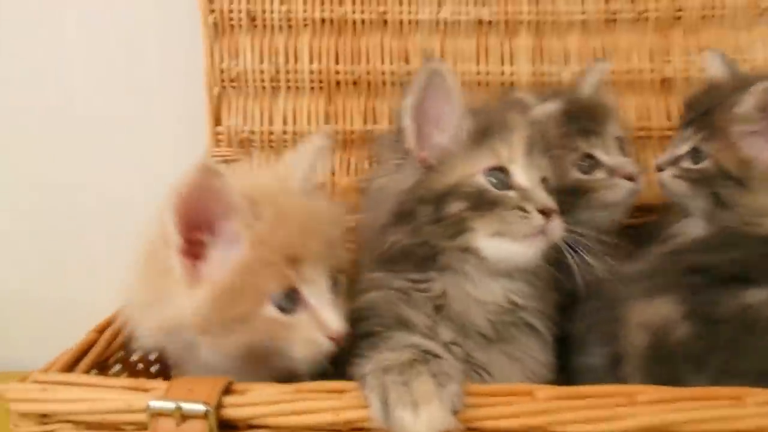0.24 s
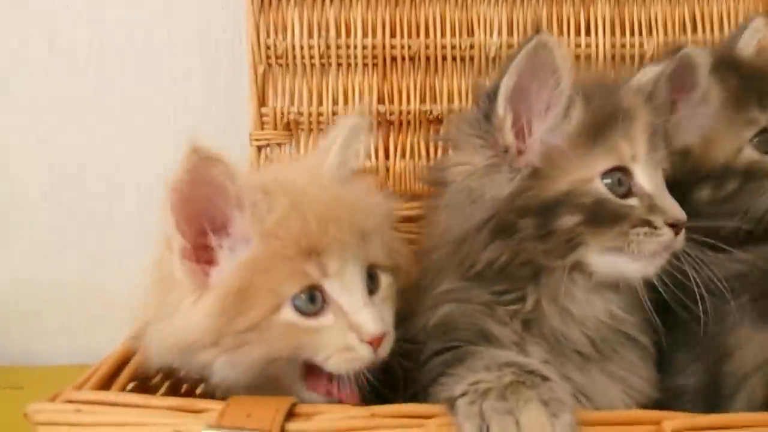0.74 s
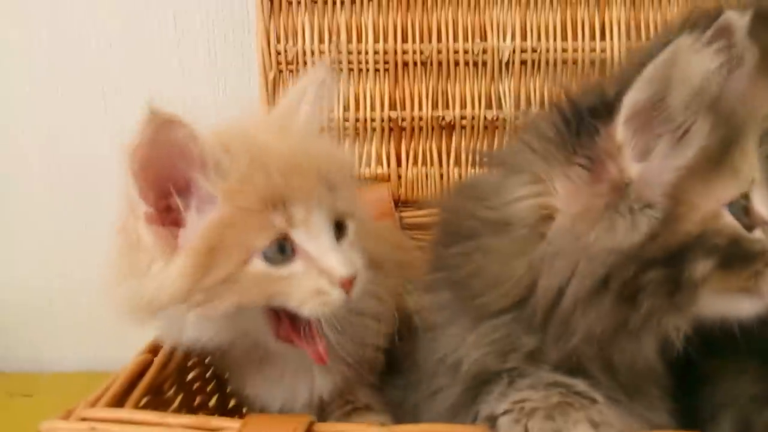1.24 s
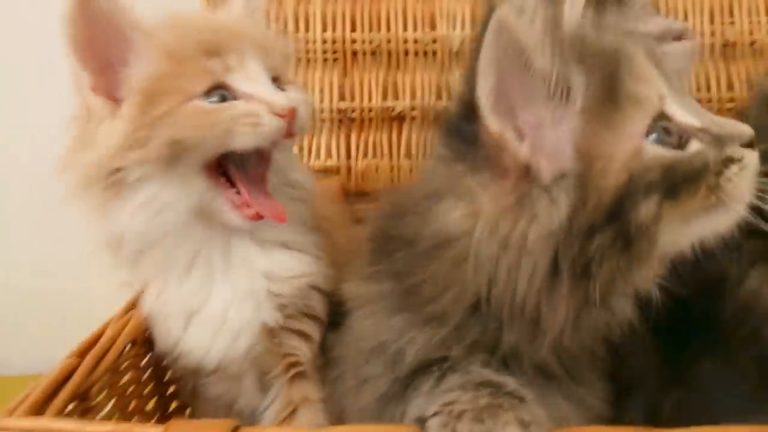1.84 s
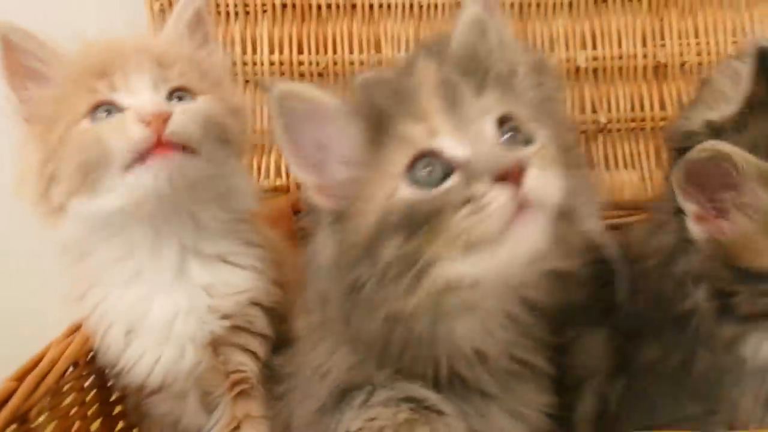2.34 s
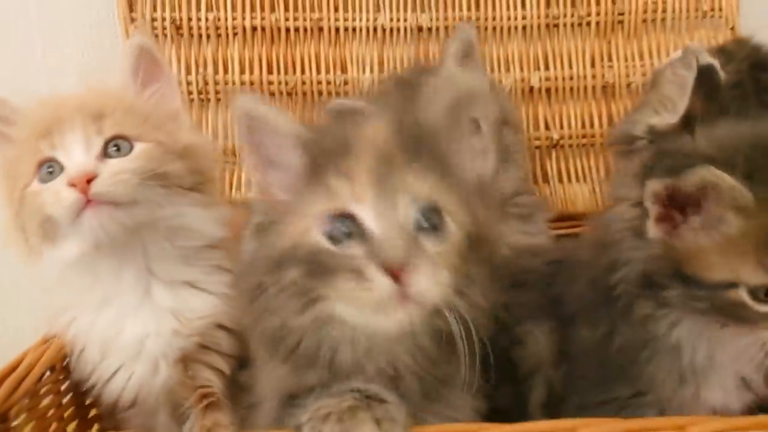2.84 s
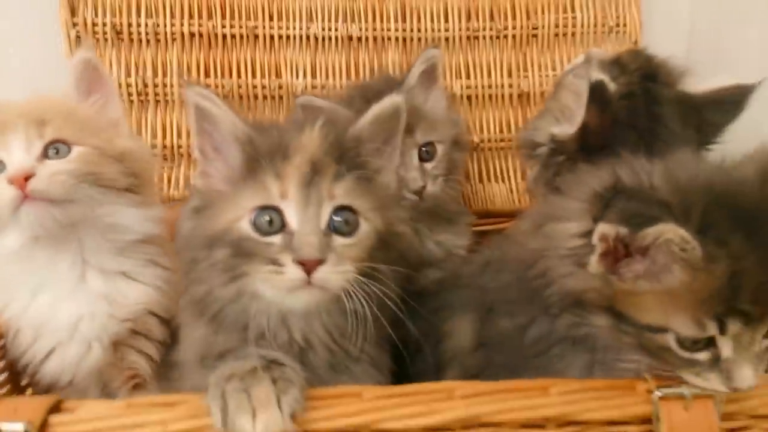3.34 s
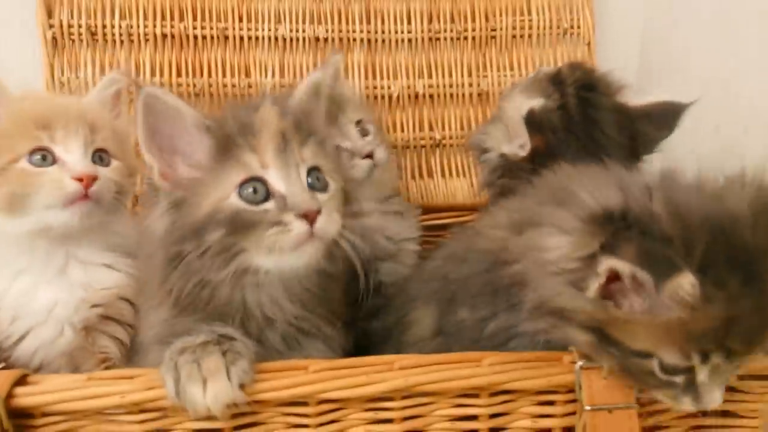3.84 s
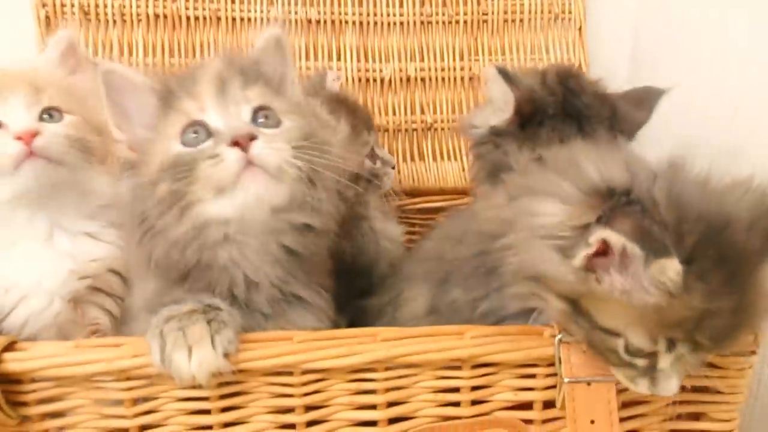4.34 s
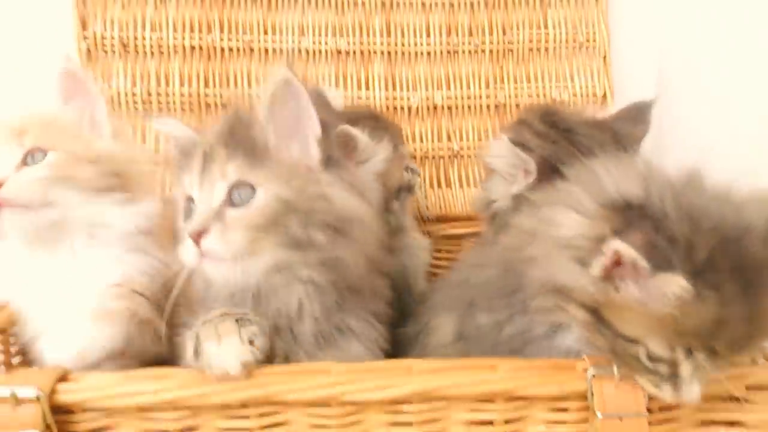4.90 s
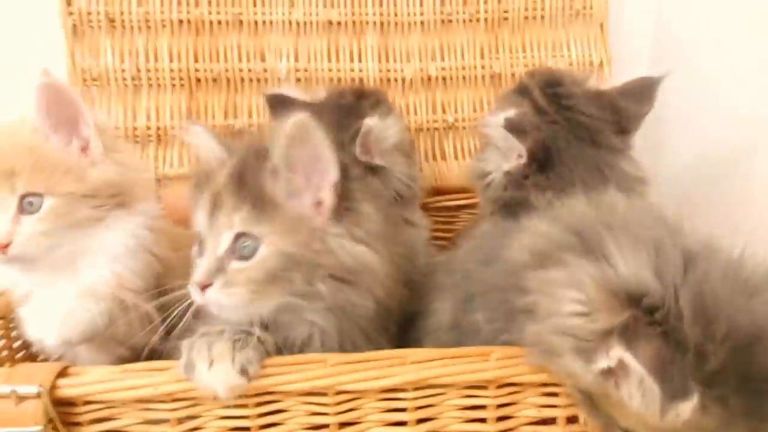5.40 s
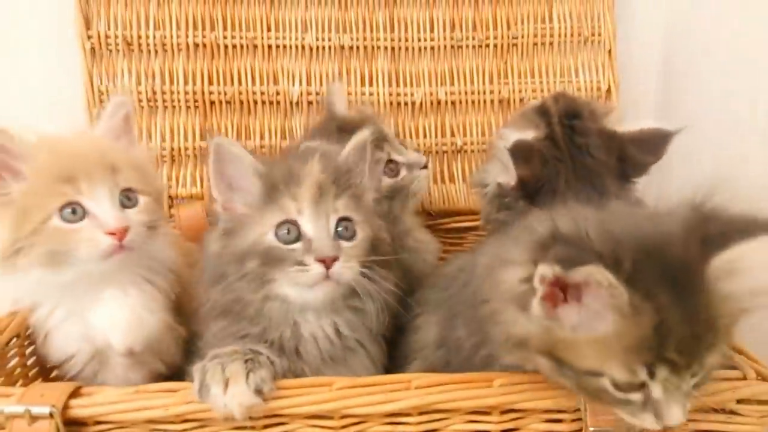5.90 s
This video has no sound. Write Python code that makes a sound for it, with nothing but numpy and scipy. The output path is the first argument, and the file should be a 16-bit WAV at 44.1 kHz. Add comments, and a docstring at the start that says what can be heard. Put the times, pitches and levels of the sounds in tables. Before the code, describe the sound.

Indoors, a stereo microphone sits close to a wicker basket of shifting kittens. A faint, echoing meow comes from far off in the house at the start, then a sharp burst of cane cracks. A second distant meow rises and falls, followed by dense dry crackling mostly to the left. Loose clicks and a soft last mew end it, over quiet hiss and low draughty rumble.

```python
"""Over room tone, a cat far off in the house meows, a drone hums and a draught buffets and flutters at the left
port. Kittens shuffle in a close wicker basket: a burst of cane cracks near 1 s, a second meow from 2 s, dense
crackle from 3.4 to 5 s, then loose clicks and mews. Air is shaped noise, the drone and flutters are gliding
tones, draught is lumpy low noise with pressure puffs, meows are overtones through throat resonances and echoes,
and wicker is noise grains and ringing slips coloured at two microphone ports."""
import sys
import numpy as np
from scipy import signal
from scipy.fft import rfft, irfft, next_fast_len
from scipy.io import wavfile
from scipy.ndimage import uniform_filter1d

SR = 44100
rng = np.random.default_rng(int(sys.argv[2]) if len(sys.argv) > 2 else 0)


def int16_out(signal):
    """Quantize to a 16-bit WAV file."""
    q = np.round(np.clip(np.atleast_2d(signal).T, -1, 1) * 32767)
    wavfile.write(sys.argv[1], SR, q.astype(np.int16))


N = 271656

# Room tone colour. Each row: frequency in Hz, relative density in dB.
AIR_COLOUR = [(26, -44.5), (45, -4), (65, -6), (196, -24.5), (549, -31.5), (3060, -38), (5500, -41.5),
              (9920, -39.5), (14700, -42), (15800, -46.5)]
# Likeness of the room tone at the two ports. Each row: frequency in Hz, correlation from -1 to 1.
AIR_LIKENESS = [(60, 0.14), (240, 0.39), (950, -0.052), (3770, -0.24), (15000, -0.25)]
# Stereo tilt of the room tone. Each row: frequency in Hz, left over right in dB.
AIR_BALANCE = [(60, 0.5), (300, -2), (1500, -2), (5000, -6), (8500, 0.5), (15000, -2.5)]
# Low drone of the house. Each row: time in seconds, pitch in Hz, relative level in dB.
DRONE = [(.2, 84.1, -75), (.3, 79.2, -51.5), (.57, 83.1, -57), (.65, 82.3, -78), (.78, 85.14, -61),
         (.85, 89.04, -56.5), (1.35, 90.06, -62), (1.5, 90.5, -54)]
# Strength of the draught. Each row: time in seconds, relative buffet level in dB, relative gust level in dB.
DRAUGHT = [(0.04, -40.5, -44), (0.19, -40.5, -55.5), (0.391, -38, -47.5), (0.65, -44.5, -55.5),
           (1.02, -45, -49), (1.07, -34, -57), (1.47, -42, -53.5), (1.511, -42.5, -49), (3.01, -40.5, -55),
           (3.08, -49.5, -48), (3.33, -34, -70), (3.519, -49, -65), (3.58, -37.5, -56.5), (3.9, -41, -61),
           (4.14, -43.5, -49.5), (4.34, -39.5, -45), (4.44, -47, -68), (5.07, -45.5, -67), (5.12, -52, -52),
           (5.19, -40.5, -47.5), (5.59, -46.5, -61), (6.1, -41.5, -58)]
# Colour of the slow buffeting. Each row: frequency in Hz, relative gain in dB.
BUFFET_COLOUR = [(2, -10.5), (5, 10.5), (14, 12), (22, -10.5), (32, -5), (45, -25), (70, -61)]
# Colour of the faster gusts. Each row: frequency in Hz, relative gain in dB.
GUST_COLOUR = [(20, 5), (40, 4), (90, -10), (130, -13.5), (200, -24), (400, -32.5), (800, -71)]
# Eddies shed at the left port, one list a flutter. Each row: time in seconds, pitch in Hz, relative level in dB.
FLUTTERS = [
    [(.78, 101.2, -45), (.85, 83.6, -55), (.93, 113, -58), (1.0, 140.8, -53.5), (1.06, 124.4, -49.5),
     (1.12, 85.5, -76)],
    [(1.5, 41.7, -44), (1.57, 56.4, -43.5), (1.62, 80.7, -43.5), (1.65, 52, -42.5), (1.7, 83.6, -43.5),
     (1.76, 120.4, -45.5), (1.82, 89.5, -44), (1.89, 78.8, -49), (1.94, 108.8, -45.5), (1.99, 123.6, -48.5),
     (2.05, 91.7, -42.5), (2.1, 78.4, -48), (2.14, 39.5, -27)],
    [(4.1, 91.5, -54), (4.16, 69, -46.5), (4.2, 89.1, -44.5), (4.27, 69.4, -53), (4.33, 74.6, -58),
     (4.4, 94, -47)],
    [(5.08, 47.6, -46.5), (5.15, 61.6, -40.5), (5.2, 47.1, -38.5), (5.27, 61.8, -49), (5.33, 60.4, -41.5),
     (5.4, 45, -51)],
]
# Single puffs on the left port. Each row: time in seconds, relative level in dB, nominal length in ms.
PUFFS = [(0.288, -50.5, 2.9), (0.357, -39.5, 3.7), (0.568, -36.5, 11), (1.501, -45, 13), (2.487, -37, 10),
         (5.257, -44.5, 2.9)]
# Long meows, one list a call. Each row: time in seconds, relative effort in dB, pitch in Hz.
MEOWS = [
    [(-.3, -77, 409), (-.1, -72, 419.7), (.1, -67.5, 427.4), (.25, -66.5, 445.4), (.34, -64.5, 452),
     (.4, -60.5, 457.6), (.45, -62.5, 486), (.52, -60.5, 484.2), (.58, -75.5, 465), (.65, -62.5, 445.5),
     (.72, -67.5, 432.5), (.78, -65, 424.3), (.84, -74, 413.2), (.92, -74, 401), (1.0, -87, 377)],
    [(2.05, -73, 386.6), (2.18, -75, 396), (2.28, -69, 414.4), (2.35, -69, 424.7), (2.42, -68, 431),
     (2.48, -66, 440.7), (2.56, -64, 469), (2.61, -65.5, 494), (2.66, -58, 502.7), (2.79, -65, 500.2),
     (2.84, -67.5, 468.3), (2.88, -65, 430), (2.96, -68, 419), (3.03, -75.5, 388), (3.12, -76.5, 383),
     (3.2, -74, 370)],
]
# Mouth opening and closing. Each row: seconds from the highest note, low and high throat resonance in Hz,
# roughness from 0 to 1, chest level in dB.
MOUTH = [(-.6, 1200, 1970, 0.655, -7), (-.35, 1350, 2050, 0.51, -9.5), (-.12, 1450, 2290, 0.4, -10),
         (-.03, 1530, 2310, 0.26, -6), (.1, 1210, 2020, .26, 7.5), (0.192, 900, 1880, 0.32, -11),
         (.45, 800, 1860, 0.37, -20)]
# Short mews. Each row: start, rise and hold in seconds, relative effort in dB, starting pitch in Hz,
# low and high throat resonance in Hz, roughness from 0 to 1.
MEWS = [(1.63, 0.015, .02, -77, 453, 900, 1100, 0.62), (3.635, .02, 0.04, -80, 455, 920, 1010, 0.6),
        (5.625, 0.012, .025, -78, 440, 890, 1490, 0.65), (5.88, 0.1, 0.3, -69.5, 506, 1020, 2025, 0.26)]
# The low, then the high throat resonance. Each row: width in Hz, level in dB.
THROAT = [(620, 0), (585, -3)]
# Chest resonance that stays in place: frequency in Hz, width in Hz.
CHEST = (860, 300)
# Echo decay of the house. Each row: frequency in Hz, time to fall 60 dB in seconds.
HOUSE_DECAY = [(400, .65), (1000, .62), (2500, .55)]
# Weight shifting on the wicker. Each row: time in seconds, relative crackle level in dB, left over right in dB,
# dullness (lows over highs) in dB.
SHUFFLE = [(0, -77, -6, 1), (0.261, -78.5, -4, 4), (0.328, -71, 1, -1), (0.499, -76, -3, 1),
           (0.801, -71.5, -2, 9), (.83, -59.5, -0.5, 12.5), (.93, -57.5, 4, 5.5), (0.959, -50.5, -1, -5),
           (1.03, -58, 2, 1.5), (1.11, -61, 6, 10), (1.17, -66, 1, 0), (1.251, -69, -1, -20),
           (1.45, -72, -1, -16), (1.5, -63, 4, -11), (1.698, -59.5, 4, 1), (1.858, -70, -3, -5),
           (2.632, -77, -1, 9), (3.05, -70, 3.5, 6), (3.389, -76, 6, 3), (3.55, -62, 2, 5),
           (3.788, -72.5, 3, 9.5), (3.87, -65, -2, 6.5), (3.958, -64, 6, 10.5), (4.09, -62.5, -4, 5),
           (4.219, -60, 5.5, 5.5), (4.339, -55, 1.5, 2), (4.43, -62, 2, 0), (4.509, -61, -4, 2),
           (4.6, -63.5, 5, 5.5), (4.7, -64, 3, 12), (4.76, -61.5, -1, 11), (4.82, -58.5, -1, 10),
           (4.949, -61.5, 5.5, 3.5), (5.071, -73, 4.5, 9), (5.521, -65, 3, 3), (5.619, -72, 2, 9.5),
           (6.16, -74.5, -5, 3)]
# The loudest cane slips. Each row: time in seconds, relative level in dB, left over right in dB,
# dullness (lows over highs) in dB, decay constant in ms.
SNAPS = [(0.3105, -44, 1, 0.5, 3), (0.322, -49, 7, 11, 3.7), (0.3662, -47, 4, -1, 3),
         (0.39, -46, 1.0, 0.5, 4), (0.401, -48, 0, 8.5, 7.2), (0.585, -53, 3, 2, 3),
         (0.6526, -34, 14, 4, 1.55), (0.8129, -52, 0, -2, 3), (0.826, -41, 7, 11, 4.4),
         (0.8429, -41, -2, 13, 3), (0.857, -40, 2, 3, 3), (0.877, -31.5, 0, -7, 3),
         (0.888, -28.5, -4, 7, 3), (0.926, -47, -2, 6, 1.6), (0.9443, -23, -1, -14, 3),
         (0.9545, -18.5, -3, -2.5, 1.5), (0.972, -27, 2, -2, 3.1), (0.9857, -39, 2, -4, 2.4),
         (0.999, -49, 2, -4, 3), (1.0154, -36.5, -3, 2, 2.5), (1.026, -40, -2, -2, 2.1),
         (1.1234, -38.5, 4, 3, 3), (1.1972, -43.5, 4, 7, 2.4), (1.4678, -44.5, 3, 5, 3.5),
         (1.489, -42.5, 9.5, -2, 3), (1.5145, -57, 5, -2, 2.8), (1.5599, -47.5, 10, -2, 3),
         (1.6277, -34.5, 3, -3, 2.2), (1.6548, -43.5, 5, 14.5, 4.8), (1.6998, -35, -1.5, 5.5, 3),
         (1.7641, -33.5, 2, -2, 3.9), (1.8953, -44, 2, 6, 1.8), (2.682, -43, -3, 4, 2.5),
         (2.7863, -46.5, 1, 6, 3.3), (2.812, -44, 3, -3, 2.65), (2.8429, -45, 2, -5, 2.9),
         (2.8864, -47, 4, -11, 3), (3.0173, -49.5, -2, 14.5, 2.95), (3.1983, -56, 18, 1, 3.1),
         (3.4033, -34.5, -1, 3, 2.16), (3.5513, -37.5, 0, -11, 4.6), (3.568, -31, 6, -16, 2.6),
         (3.589, -39, 2, 1, 5.5), (3.6247, -41.5, 2, -4, 2.2), (3.6694, -41, 5, 7, 0.86),
         (3.7165, -37, 7, -2, 1.4), (3.748, -42, 7, 0, 1.4), (3.816, -45, 5, 0, 1.8),
         (3.8245, -40, 7, 8.5, 2.5), (3.8481, -35, 13, -4, 7.6), (3.895, -44, 3, 0.5, 3.6),
         (3.9834, -36, 5, -4, 4), (4.0267, -33, 5, 4.5, 8), (4.0597, -33, 10, 2, 5),
         (4.0855, -36.5, 20, 2, 1.4), (4.1285, -33, 3, 9, 3.1), (4.1758, -34.5, 7, -1, 2),
         (4.249, -37, 6, -6, 3), (4.2603, -35.5, 9, -10, 3.3), (4.27, -33, 9, -5, 3.5),
         (4.2799, -30, 15, -7, 3), (4.297, -40, 3, -5, 3), (4.316, -33, 8, 5, 3.3),
         (4.327, -26, 13, -9, 1.7), (4.351, -31, 11, 0, 4.3), (4.3653, -25, -4, -1.5, 2.6),
         (4.374, -34, 4, -2, 3), (4.419, -36, 4, -5, 2.8), (4.4672, -33, 7, -3, 9.1),
         (4.477, -34, 4, 4.5, 8), (4.4962, -35, 6, -12, 2.9), (4.503, -34, 14, 2, 7.7),
         (4.531, -33.5, 13, -13, 2.6), (4.5416, -31, 14, -17, 4.4), (4.5735, -36.5, 11, 1, 2.3),
         (4.6349, -35.5, 4, 2, 3.5), (4.6803, -38, 6, 7.5, 4.4), (4.699, -48, 5, -1, 3),
         (4.7196, -38, 13, 5, 4.6), (4.744, -40, 6, -2, 4), (4.7742, -30, 16, -12, 3.5),
         (4.779, -32, 7, -3, 5.4), (4.8032, -37, 8, 7, 4), (4.835, -47, 6, -3, 1.8),
         (4.9452, -45, 11, -8, 3), (5.3688, -45.5, 6, -2, 3.3), (5.4425, -46, 10, 9, 4.4),
         (5.482, -43.5, 7.0, 4, 4.5), (5.516, -41.5, 9, 2, 3.4), (5.6087, -47.5, 21, -7, 1.8),
         (5.7159, -47.5, 1, 11, 2.5)]
# Cane click colour at the left port. Each row: frequency in Hz, relative gain in dB.
PORT_LEFT = [(600, -24), (2000, -24), (4500, -16), (7000, -12), (8800, -6), (10000, 0.5), (11500, -7),
             (13000, -11), (15000, -14)]
# Cane click colour at the right port. Each row: frequency in Hz, relative gain in dB.
PORT_RIGHT = [(600, -34), (2000, -14), (4500, -9.5), (6500, -1.5), (7400, 2.5), (8600, -2), (9700, -1.5),
              (11000, -5), (15000, -10)]

AIR_DB = -67  # rms above 200 Hz, before the stereo tilt
HALL_HZ, HALL_WIDTH_HZ, HALL_DB = 851, 26, 3  # one standing wave on the way rings on
MEW_FALL_S, MEW_ENDS_DB, MEW_SAG, MEW_CHEST_DB = .05, -9, 0.014, -15  # sag is a share of the pitch
SMALL_SLIPS, SMALL_DECAY_MS = 70, 5.2
SMALL_OVER_DB, SMALL_SPREAD_DB, SMALL_PAN_DB = 14, 2.5, 4  # first one: over the crackle curve
DULL_DRIFT_DB, PAN_DRIFT_DB = 1.5, 2.5
SETTLE_DB, SETTLE_S = -32.5, 0.022  # after each slip the neighbouring canes crackle on for a moment
CREEP_DB, CREEP_S = -31.5, 0.0056  # the canes start to crackle just before a slip
BREAK = 50  # samples from the start of a slip to its sharpest break
RING_HZ, RING_SPREAD, RING_WIDTH_HZ, RING_SHARE = 9070, 0.22, 1530, 0.32  # each cane favours its own pitch
MAX_LAG = 14  # samples, the most a click may come early or late at the left port
SLIP_SIZE = 1500  # samples
EDGE_HZ = 15600


def amp(db):
    """Gain of a level in dB."""
    return 10 ** (np.asarray(db) / 20)


def evened(x):
    """Scales to rms 1."""
    return x / np.sqrt(np.mean(x ** 2) + 1e-20)


def read(points, hz):
    """Value of a spectrum table at the frequencies hz, on a log frequency scale."""
    f, value = np.transpose(points)
    return np.interp(np.log(hz + 1), np.log(f + 1), value)


def played(rows):
    """Sample numbers and interpolated columns of a curve."""
    s, *columns = np.transpose(rows)
    n = np.arange(round(s[0] * SR), round(s[-1] * SR))
    return n, [np.interp(n / SR, s, c) for c in columns]


def wander(size, hz):
    """Random curve of rms 1 that changes about hz times a second."""
    width = max(int(SR / hz), 1)
    smooth = uniform_filter1d(rng.standard_normal(size), width)
    return evened(uniform_filter1d(smooth, width))


def coloured(x, spectrum):
    """Shapes a whole signal by a spectrum table."""
    size = next_fast_len(N)
    gain = amp(read(spectrum, np.fft.rfftfreq(size, 1 / SR)))
    return irfft(rfft(x, size) * gain, size)[..., :N]


def resonance(x, hz, width_hz):
    """A single ringing peak with gain 1 at its centre."""
    return signal.lfilter(*signal.iirpeak(hz, hz / width_hz, SR), x)


def decaying(x, seconds):
    """Each sample leaves an exponential tail."""
    return signal.lfilter([1], [1, -np.exp(-1 / (seconds * SR))], x)


def echoes(t60s, seconds):
    """Two unlike tails of sparse taps, each band dying at its own speed, energy 1."""
    size = int(seconds * SR)
    taps = rng.choice([-1., 1.], (2, size)) * (rng.random((2, size)) < .06)
    hz, t, z = signal.stft(taps, SR, nperseg=256)
    decay = amp(-60 * t / read(t60s, hz)[:, None])
    tail = signal.istft(z * decay, SR, nperseg=256)[1]
    return tail / np.linalg.norm(tail, axis=1, keepdims=True)


def air():
    """Steady room tone and microphone hiss: noise whose likeness at the two ports varies with frequency."""
    hz = np.fft.rfftfreq(N, 1 / SR)
    colour = amp(read(AIR_COLOUR, hz))
    colour /= np.sqrt(np.mean(colour ** 2 * (hz > 200)))
    a, b = rfft(rng.standard_normal((2, N))) * colour
    same = read(AIR_LIKENESS, hz)
    tilt = amp(read(AIR_BALANCE, hz) / 2)
    left, right = a * tilt, (same * a + np.sqrt(1 - same ** 2) * b) / tilt
    return irfft([left, right], N) * amp(AIR_DB)


def eddy(rows, second_db, waver_db):
    """A soft gliding low tone with a weak octave, unsteady in strength."""
    n, (hz, db) = played(rows)
    angle = 2 * np.pi * np.cumsum(hz) / SR
    tone = np.sin(angle) + amp(second_db) * np.cos(2 * angle)
    strength = amp(db + 3 + waver_db * wander(len(n), 25))
    out = np.zeros(N)
    out[n] = strength * tone * signal.windows.tukey(len(n), .1)
    return out


def drone():
    """A low tone from the house, nearer the right port."""
    return amp([[-6], [0]]) * eddy(DRONE, second_db=-16, waver_db=0.97)


def puff(db, ms):
    """One push and release of pressure."""
    u = np.arange(SR // 10) / SR / (ms / 1000 + 0.00074)
    return amp(db + 21) * u * (1 - u / 2) * np.exp(-u)


def draught():
    """Lumpy low pressure noise, far stronger at the left port, with passing flutters and puffs."""
    s, buffet_db, gust_db = np.transpose(DRAUGHT)
    t = np.arange(N) / SR
    buffet = evened(coloured(rng.standard_normal((2, N)) * amp(wander(N, 11.5)), BUFFET_COLOUR))
    gust = evened(coloured(rng.standard_normal((2, N)) * amp(3 * wander(N, 14)), GUST_COLOUR))
    left = buffet[0] * amp(np.interp(t, s, buffet_db) + 7)
    left += gust[0] * amp(np.interp(t, s, gust_db) + 6)
    left += sum(eddy(rows, second_db=-19.5, waver_db=1) for rows in FLUTTERS)
    for start, db, ms in PUFFS:
        left[round(start * SR):][:SR // 10] += puff(db, ms)
    # the right port has faint noise of its own and a little of the left
    right = amp(-53) * buffet[1] + amp(-67.5) * gust[1] + amp(-26) * left
    return np.array([left, right])


def calls():
    """Full curves for every call: the mouth follows a meow's highest note, a mew swells, holds and sags."""
    lag, *mouth = np.transpose(MOUTH)
    for s, db, hz in map(np.transpose, MEOWS):
        top = s[np.argmax(hz)]
        at = np.union1d(s, np.clip(lag + top, s[0], s[-1]))
        shape = [np.interp(at - top, lag, m) for m in mouth]
        yield np.transpose([at, np.interp(at, s, db), np.interp(at, s, hz), *shape])
    for start, rise, hold, db, hz, *throat in MEWS:
        throat = [*throat, MEW_CHEST_DB]
        s = start + np.cumsum([0, rise, hold, MEW_FALL_S])
        yield [(s[0], db + MEW_ENDS_DB, hz, *throat),
               (s[1], db, hz, *throat),
               (s[2], db, hz * (1 - MEW_SAG), *throat),
               (s[3], db + MEW_ENDS_DB, hz * (1 - 2 * MEW_SAG), *throat)]


def formant(hz, centre_hz, width_hz, db):
    """How strongly a body resonance passes an overtone."""
    return amp(db) / (1 + (2 * (hz - centre_hz) / width_hz) ** 2) ** 2


def meow(rows):
    """Overtones of the vocal folds, weighed by two moving throat resonances and a still chest resonance."""
    n, (effort_db, hz, low_hz, high_hz, rough, chest_db) = played(rows)
    # rough voices waver more in pitch
    waver = 0.02 * rough * wander(len(n), 40) + 0.0065 * wander(len(n), 18)
    turns = np.cumsum(hz * (1 + waver)) / SR
    voice = 0
    for k in np.arange(2, 15) / 2:  # multiples of the pitch, in half steps
        weight = formant(k * hz, *CHEST, chest_db)
        for centre_hz, (width_hz, db) in zip([low_hz, high_hz], THROAT):
            weight = weight + formant(k * hz, centre_hz, width_hz, db)
        if k % 1:  # uneven folds add lines halfway between
            weight = weight * 0.37 * rough * (k > 2)
        leak = rough * np.clip((k - 1.2) / 1.03 + rough ** 3, 0, 1)  # air leaks smear the higher lines most
        hoarse = (1 - leak) + 1.36 * leak * wander(len(n), 430)
        swell = amp(1.8 * wander(len(n), 30))  # each line swells and fades on its own
        voice += weight * swell * hoarse * np.cos(2 * np.pi * k * turns)
    return n, amp(effort_db + 5) * voice * signal.windows.tukey(len(n), .1)


def cat():
    """The calls arrive mostly as echoes of the rooms between, a little stronger at the right port."""
    lead = SR // 2  # room for the call that begins before time zero
    dry = np.zeros(N + 2 * lead)
    for rows in calls():
        n, voice = meow(rows)
        dry[n + lead] += voice
    wet = signal.fftconvolve(dry[None], echoes(HOUSE_DECAY, 1.1), axes=1)[:, lead:lead + N]
    wet = wet + amp(HALL_DB) * resonance(wet, HALL_HZ, HALL_WIDTH_HZ)
    return amp([[-2.5], [2.5]]) * (wet + amp(-7) * dry[lead:lead + N])


def click(spectrum):
    """The causal (minimum phase) pulse with this spectrum, energy 1."""
    log_gain = np.log(amp(read(spectrum, abs(np.fft.fftfreq(1024, 1 / SR)))))
    pulse = np.fft.ifft(np.exp(np.conj(signal.hilbert(log_gain)))).real[:256]
    return pulse / np.linalg.norm(pulse)


def small_slips(level_db):
    """Lesser slips in rows like SNAPS, placed by chance, more of them where the crackle is loud."""
    where = rng.random(SMALL_SLIPS)
    draws = np.clip(rng.standard_normal((SMALL_SLIPS, 3)), -1.5, 1.5)
    chance = np.cumsum(amp(level_db / 2))
    at = np.minimum(np.searchsorted(chance, where * chance[-1]), N - 1)
    db = level_db[at] + SMALL_OVER_DB + SMALL_SPREAD_DB * draws[:, 0]
    pan_db = SMALL_PAN_DB * (1 + draws[:, 1])
    dull_db = DULL_DRIFT_DB * draws[:, 2]
    return np.transpose([at / SR, db, pan_db, dull_db, np.full(SMALL_SLIPS, SMALL_DECAY_MS)])


def crackle(level_db, slips):
    """Clumps of tiny random cane clicks under the moving weight, thicker around each slip."""
    kicks = np.zeros(N)
    np.add.at(kicks, (slips[:, 0] * SR).astype(int), amp(slips[:, 1]))
    settling = amp(SETTLE_DB) * decaying(kicks, SETTLE_S)
    creeping = amp(CREEP_DB) * decaying(kicks[::-1], CREEP_S)[::-1]
    sizes = amp(2.7 * np.minimum(rng.exponential(1, N), 5)) * rng.choice([-1, 1], N)
    clumps = amp(3 * wander(N, 90) + 1.5 * wander(N, 25))
    clicks = sizes * (rng.random(N) < 6000 / SR)  # about 6000 a second
    return evened(clicks * clumps) * (amp(level_db) + settling + creeping)


def cane_slip(decay_ms):
    """A short rasp of sparse noise with one sharp break, part of it ringing at the cane's own pitch."""
    draws = rng.standard_normal((2, SLIP_SIZE))
    u = np.arange(SLIP_SIZE) / SR
    rasp = draws[0] * np.minimum(abs(draws[0]), 1.8) * (abs(draws[1]) > .7)
    slip = rasp * np.exp(-u / (decay_ms / 1000)) * (1 - np.exp(-u / 0.001))
    slip *= 1.5 / abs(slip).max()
    slip[BREAK] = 1.2
    ring_hz = RING_HZ * np.exp(RING_SPREAD * np.clip(draws[1, 1], -2, 2))
    ring = resonance(slip, ring_hz, RING_WIDTH_HZ)
    late = int(np.clip(6 * draws[1, 0], -MAX_LAG, MAX_LAG))
    return (1 - RING_SHARE) * slip + 2 * RING_SHARE * ring, late


def wicker():
    """Crackle and louder slips of dry canes, each from its own side, with a short basket echo."""
    t = np.arange(N) / SR
    s, *columns = np.transpose(SHUFFLE)
    level_db, pan_db, dull_db = (np.interp(t, s, c) for c in columns)
    pan_db = pan_db + PAN_DRIFT_DB * wander(N, 11)
    dull_db = dull_db + DULL_DRIFT_DB * wander(N, 15)
    slips = np.array([*SNAPS, *small_slips(level_db)])
    grains = crackle(level_db, slips)
    lag = rng.integers(-MAX_LAG, MAX_LAG + 1, N)
    ports = np.zeros((2, 2, N + 2000))  # bright and dull part at each port
    for part, gain in enumerate([1, amp(dull_db)]):
        np.add.at(ports[part, 0], np.arange(N) + MAX_LAG + lag, grains * gain * amp(pan_db / 2))
        ports[part, 1, MAX_LAG:N + MAX_LAG] = grains * gain * amp(-pan_db / 2)
    for start, db, side_db, slip_dull_db, decay_ms in slips:
        slip, late = cane_slip(decay_ms)
        at = round(start * SR) + MAX_LAG
        for part, gain in enumerate([1, amp(slip_dull_db)]):
            ports[part, 0, at + late:at + late + SLIP_SIZE] += slip * gain * amp(db - 0.5 + side_db / 2)
            ports[part, 1, at:at + SLIP_SIZE] += slip * gain * amp(db - 3 - side_db / 2)
    # lows come from the dull part, highs from the bright one
    bright, dull = ports
    mixed = bright + signal.lfilter(*signal.butter(1, 4500, fs=SR), dull - bright)
    near = np.array([signal.oaconvolve(x, click(colour))[MAX_LAG:N + MAX_LAG]
                     for x, colour in zip(mixed, [PORT_LEFT, PORT_RIGHT])])
    basket = echoes([(3000, 0.42), (12000, 0.099)], .2)  # (Hz, seconds to fall 60 dB)
    return near + amp(-8) * signal.fftconvolve(near, basket, axes=1)[:, :N]


def scene():
    """Room tone, drone, draught, distant cat and close basket."""
    return air() + drone() + draught() + cat() + wicker()


def record(dry):
    """The band limit of the recorder: a steep low-pass without delay."""
    edge = signal.firwin(511, EDGE_HZ, window=("kaiser", 9), fs=SR)
    padded = np.pad(dry, [(0, 0), (255, 255)], "reflect")
    return signal.oaconvolve(padded, edge[None], "valid")


dry = scene()
out = record(dry)
int16_out(out)
```